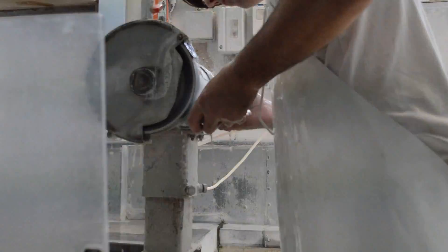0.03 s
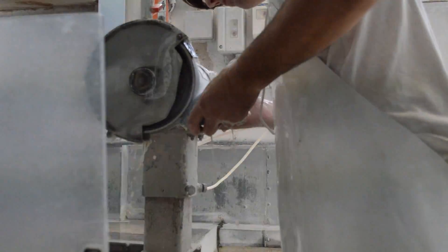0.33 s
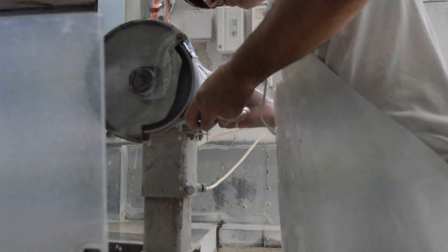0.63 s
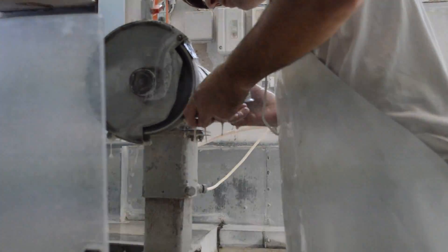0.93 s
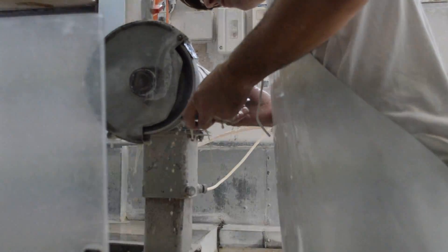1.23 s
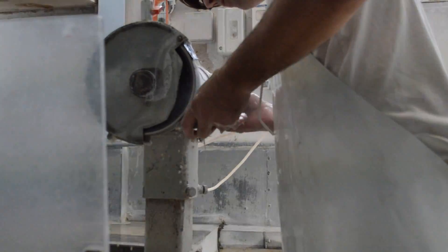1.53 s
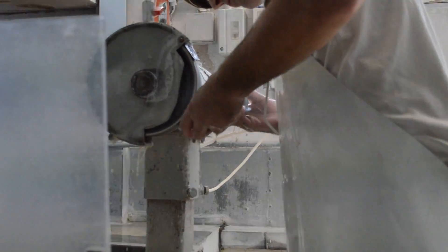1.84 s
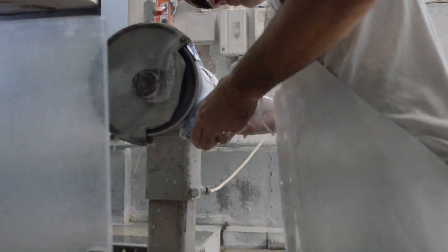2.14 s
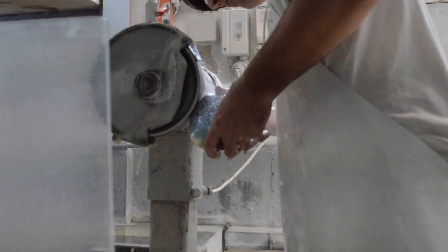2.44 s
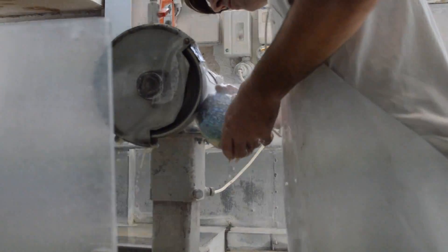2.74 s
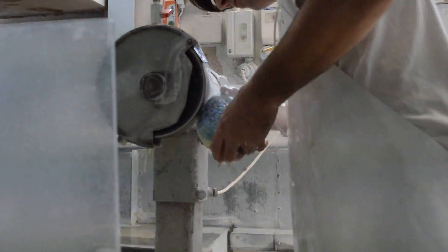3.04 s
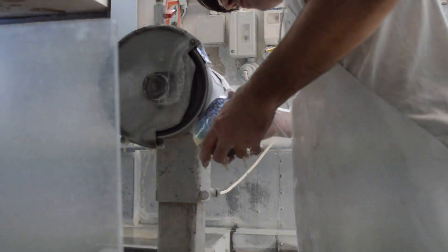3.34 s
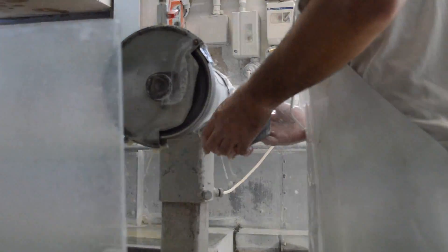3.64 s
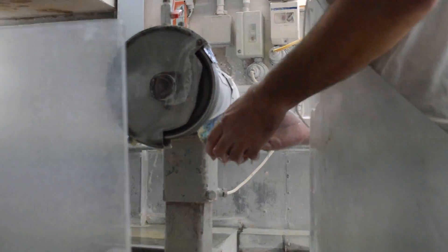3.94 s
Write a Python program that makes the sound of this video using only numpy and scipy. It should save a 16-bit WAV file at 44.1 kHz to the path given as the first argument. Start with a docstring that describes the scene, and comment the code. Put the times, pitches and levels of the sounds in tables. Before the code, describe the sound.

A shell grinds on a wheel with a bright rasp, lifting off to leave motor noise.

```python
"""A bright, rasping hiss cuts in close by: a shell pressed against a wet grinding wheel in a workshop.
Grit strikes the shell, and the hiss follows the pressure. Grit also sets the shell's resonances ringing,
lower once it is turned; now and then its edge bites in a short, harsh burst.
When it is lifted off, the hum and rush of the machine come forward, with a fizz of spray."""
import sys
import numpy as np
from scipy import signal
from scipy.fft import rfft, irfft, next_fast_len
from scipy.io import wavfile
from scipy.ndimage import uniform_filter1d, map_coordinates

SR = 44100
rng = np.random.default_rng(int(sys.argv[2]) if len(sys.argv) > 2 else 0)


def persist_wave(psi):
    """Save psi, clipped to +-1, as 16-bit WAV."""
    counts = np.round(np.clip(psi, -1, 1) * 32767).astype(np.int16)
    wavfile.write(sys.argv[1], SR, np.atleast_2d(counts).T)


N = 176400
TIME_S = np.arange(N) / SR
WHEEL_HZ = 47.9  # turns a second


def amp(db):
    """Amplitude ratio: a factor of ten for every 20 dB."""
    return 10 ** (np.asarray(db) / 20)


def envelope(points):
    """Exponential growth and decay: straight lines in decibels between (time_s, level_db) points."""
    return amp(np.interp(TIME_S, *np.transpose(points)))


def unit_rms(x):
    """Normalisation to a mean power of one."""
    return x / np.sqrt(np.mean(x ** 2) + 1e-20)


def wobble(rate_hz):
    """Smooth random modulation: a spline through rate_hz Gaussian values a second."""
    knots = rng.standard_normal(int(N * rate_hz / SR) + 4)
    return map_coordinates(knots, [TIME_S * rate_hz])


def filtered(x, response):
    """Linear filtering: the spectrum is multiplied by a frequency response."""
    size = next_fast_len(N + 8192)
    return irfft(rfft(x, size) * response(np.fft.rfftfreq(size, 1 / SR)), size)[:N]


def coloured(x, spectrum):
    """Spectral shaping by (frequency_hz, gain_db) points; the result has rms 1."""
    points_hz, gain_db = np.transpose(spectrum)
    return unit_rms(filtered(x, lambda hz: amp(np.interp(np.log(hz + 1), np.log(points_hz), gain_db))))


def resonance(x, pitch_hz, width_hz):
    """Two damped resonators in cascade, with half-power bandwidth width_hz; the result has rms 1."""
    stage_hz = 1.55 * width_hz  # each stage is wider than the pair

    def response(hz):
        damping = 1j * hz * stage_hz
        return (damping / (pitch_hz ** 2 - hz ** 2 + damping)) ** 2
    return unit_rms(filtered(x, response))


def patchy(x, depth_db):
    """Random gain over time and frequency makes the colour shift from moment to moment."""
    spectrogram = signal.stft(x, nperseg=1024)[2]
    field = uniform_filter1d(rng.standard_normal(spectrogram.shape), size=8, axis=0)
    field = unit_rms(uniform_filter1d(field, size=7, axis=1))
    return signal.istft(spectrogram * amp(depth_db * field), nperseg=1024)[1][:N]


def grit(strikes_per_s=3600, log_spread=0.3, power_share=0.45):
    """Shot noise: single grains strike at random over a bed of steady friction noise."""
    struck = rng.random(N) < strikes_per_s / SR
    sizes = np.exp(log_spread * rng.standard_normal(N))
    strikes = unit_rms(struck * sizes * rng.choice([-1, 1], N))
    return np.sqrt(power_share) * strikes + np.sqrt(1 - power_share) * rng.standard_normal(N)


def chatter(fast_db, slow_db, once_a_turn_db=0.6):
    """Amplitude modulation: the shell trembles, and the uneven wheel nudges it once a turn."""
    tremble_db = fast_db * wobble(650) + slow_db * wobble(55)
    nudge_db = once_a_turn_db * np.sin(2 * np.pi * WHEEL_HZ * TIME_S)
    return unit_rms(amp(tremble_db + nudge_db))


def room(x, t60_s=0.14, reflections_db=-7, cutoff_hz=15000):
    """Reverberation: dense reflections from nearby walls arrive after 4 ms and decay exponentially."""
    t = np.arange(SR // 3) / SR
    tail = rng.standard_normal(len(t)) * amp(-60 * t / t60_s) * (t > .004)
    reflections = signal.fftconvolve(x, tail / np.linalg.norm(tail))[:N]
    return x + amp(reflections_db) * filtered(reflections, lambda hz: 1 / (1 + (hz / cutoff_hz) ** 2))


# Tones of the motor: pitch_hz, relative_db, waver_db
HUM_TONES = [(162.9, -3.5, 2), (250, -7.5, 2.5), (325.3, -7.5, 4), (791, -8.5, 2.5), (895, -14, -4)]
# Envelopes of the motor hum and of the wheel's deep drone: time_s, level_db
HUM_LEVEL = [(.04, -43.5), (.3, -30.5), (.8, -31.5), (1.5, -31), (2.3, -32.5), (3.05, -31), (3.45, -29.5),
             (3.78, -21), (4, -21)]
DRONE_LEVEL = [(0.04, -69), (0.07, -51), (0.89, -40.5), (1.45, -56), (1.75, -44), (2.31, -56), (3.93, -38),
               (4.0, -53)]


def motor():
    """Rotating machinery radiates tones: a wavering hum, and a drone at the rotation frequency."""
    hum = np.zeros(N)
    for pitch_hz, relative_db, waver_db in HUM_TONES:
        gain = amp(relative_db + waver_db * wobble(9))
        phase_drift = 0.14 * waver_db * wobble(14)
        hum += gain * np.sin(2 * np.pi * pitch_hz * TIME_S + phase_drift)
    drone = np.sin(2 * np.pi * WHEEL_HZ * TIME_S)
    return envelope(HUM_LEVEL) * hum + envelope(DRONE_LEVEL) * drone


# Spectrum of the running wheel and its spray: frequency_hz, gain_db
RUSH_SPECTRUM = [(25, -46), (55, -24), (75, -22), (95, -19.5), (140, -11), (200, -6.5), (310, -3.5),
                 (450, -9.5), (750, -12.5), (1300, -13), (2000, -16), (3600, -12.5), (4700, -16.5),
                 (6000, -23.5), (7300, -29), (9700, -20), (11000, -26.5), (13000, -37), (15500, -47)]
# Envelope of that rush: time_s, relative_db
RUSH_LEVEL = [(.04, -38), (.2, -31.5), (.36, -26), (.45, -32.5), (.8, -29), (1.1, -30), (1.41, -30.5),
              (1.6, -27), (2.05, -30.5), (2.4, -32), (2.53, -27), (3.0, -26.5), (3.15, -32), (3.4, -28),
              (3.55, -22), (3.75, -21), (4, -19)]


def wheel_rush(gain_db=3, flutter_db=0.62):
    """Broadband noise from the wheel and its spray, with slight random amplitude modulation."""
    rush = coloured(patchy(grit(), depth_db=1), RUSH_SPECTRUM)
    return envelope(RUSH_LEVEL) * amp(gain_db + flutter_db * wobble(25.15)) * rush


# Spatters thrown off the wheel: start_s, peak_db
SPLASHES = [(1.251, -25), (2.19, -22), (3.443, -16), (3.51, -18.5), (3.585, -28), (3.655, -20)]
# Their spectrum: frequency_hz, gain_db
SPLASH_SPECTRUM = [(500, -28), (2200, -8), (3000, -5), (3900, 1.5), (4900, -9), (6200, -20), (9000, -38),
                   (15800, -60)]


def splashes(rise_s=0.0075):
    """Impact noise: flung water and grit make bursts that swell quickly and die away."""
    bursts = np.zeros(N)
    for start_s, peak_db in SPLASHES:
        age = np.maximum(TIME_S - start_s, 0) / rise_s
        bursts += amp(peak_db) * age * np.exp(1 - age)
    return bursts * coloured(grit(), SPLASH_SPECTRUM)


# Catches of the shell's edge: start_s, length_s, level_db
BITES = [(.905, 0.043, -24), (1.728, 0.01, -15), (1.746, 0.009, -16), (1.929, 0.0084, -23),
         (1.948, 0.0099, -11), (1.970, .013, -9.5), (2.004, 0.014, -9.5), (2.042, .005, -15),
         (2.053, 0.027, -23), (2.705, 0.043, -23), (3.093, 0.021, -12), (3.363, 0.025, -15)]
# Their spectrum: frequency_hz, gain_db
BITE_SPECTRUM = [(3000, -21), (7000, -6.5), (8800, -14), (10000, 5), (11200, -4), (12500, -5), (13300, -12),
                 (15800, -20.5)]


def edge_bites(attack_s=0.0029, release_s=0.0025):
    """Friction transients: the force rises, holds and decays each time the edge catches the wheel."""
    force = np.zeros(N)
    for start_s, length_s, level_db in BITES:
        attack = np.clip((TIME_S - start_s) / attack_s, 0, 1)
        release = np.exp(-np.maximum(TIME_S - start_s - length_s, 0) / release_s)
        force += amp(level_db) * attack * release
    return force * coloured(grit() * chatter(fast_db=2.7, slow_db=0.5), BITE_SPECTRUM)


# Shell resonances that sing out briefly: centre_s, length_s, pitch_hz, width_hz, peak_db
FLARES = [(.33, .07, 6250, 170, -27.5), (0.398, 0.1, 4470, 250, -23.5), (0.552, .08, 11100, 900, -18.5),
          (0.73, 0.056, 4430, 280, -26), (.92, 0.038, 8400, 700, -16.5), (1.115, 0.077, 9620, 250, -16.5),
          (1.312, 0.052, 8360, 702, -18), (1.31, 0.06, 9450, 298, -16), (1.451, 0.086, 9700, 250, -20.5),
          (1.643, 0.19, 1550, 130, -29), (1.668, 0.17, 2810, 280, -24), (1.682, 0.081, 3880, 650, -23),
          (1.805, 0.033, 9200, 250, -17), (1.983, 0.22, 2530, 200, -32.5), (2, 0.077, 5890, 250, -25),
          (2.218, 0.14, 3340, 300, -34), (2.973, .07, 2394, 200, -28), (3.038, 0.045, 3900, 200, -26),
          (3.323, 0.047, 9300, 250, -22)]


def mode_flares():
    """Selective excitation: single modes swell and fade as the contact point wanders."""
    drive, out = grit(), np.zeros(N)
    for centre_s, length_s, pitch_hz, width_hz, peak_db in FLARES:
        swell = np.exp(-2 * ((TIME_S - centre_s) / length_s) ** 2)
        out += amp(peak_db) * swell * resonance(drive, pitch_hz, width_hz)
    return out


# Shell modes as first held, then three groups once turned: pitch_hz, width_hz, relative_db
FIRST_MODES = [(1665, 185, -7), (3030, 530, -1), (4330, 580, -2.5), (6290, 400, -2)]
TURNED_LOW_MODES = [(1284, 31, -0.94), (1344.2, 47, -0.11)]
TURNED_MID_MODES = [(2510, 150, -3.5), (2960, 260, -7.5), (4043, 220, 4)]
TURNED_HIGH_MODES = [(4165, 360, -10.5), (5635, 230, -4), (7500, 430, -3)]
# How strongly each group rings: time_s, level_db
FIRST_RING = [(.04, -35), (.2, -28.5), (.36, -28.5), (.6, -30), (.78, -26), (1.1, -28), (1.5, -28.5),
              (1.75, -44), (2, -64.5)]
LOW_RING = [(1.75, -64), (1.93, -31.5), (2.1, -41.5), (2.27, -30), (2.4, -37.5), (2.55, -31), (2.72, -24.5),
            (2.85, -30.5), (2.97, -22), (3.08, -37.5), (3.3, -34), (3.4, -42.5)]
MID_RING = [(1.6, -70), (1.85, -38), (1.98, -33), (2.12, -28), (2.26, -24), (2.42, -34), (2.6, -27.5),
            (2.7, -26), (2.86, -27), (2.99, -25.5), (3.13, -28), (3.25, -38), (3.36, -29.5)]
HIGH_RING = [(1.6, -75), (1.85, -29), (2, -31), (2.15, -30.5), (2.35, -24.5), (2.48, -28), (2.6, -35),
             (2.73, -23.5), (2.85, -32.5), (3, -25), (3.13, -17.5), (3.26, -28.5), (3.35, -17.5),
             (3.41, -32)]
# Glide of all these modes as the contact moves over the shell: time_s, pitch_ratio
MODE_GLIDE = [(0, 1.02), (0.401, 0.95), (.56, 1.03), (.75, 1.004), (1.0, 1.02), (1.7, 1.0), (2.0, 1),
              (2.3, 1.005), (2.6, .99), (2.931, 0.97), (3.1, 1.015), (3.35, 0.99)]


def shell_ring(waver_db=1.5):
    """Forced vibration: grit drives the hand-damped shell; which modes answer depends on the hold."""
    drive, out = grit() * chatter(fast_db=1.2, slow_db=0.7), np.zeros(N)
    read_position = np.cumsum(np.interp(TIME_S, *np.transpose(MODE_GLIDE)))  # resampling bends pitch
    for modes, ring_level in [(FIRST_MODES, FIRST_RING), (TURNED_LOW_MODES, LOW_RING),
                              (TURNED_MID_MODES, MID_RING), (TURNED_HIGH_MODES, HIGH_RING)]:
        ringing = sum(amp(relative_db + waver_db * wobble(12)) * resonance(drive, pitch_hz, width_hz)
                      for pitch_hz, width_hz, relative_db in modes)
        gliding = map_coordinates(ringing, [read_position], mode="mirror")
        out += envelope(ring_level) * unit_rms(gliding)
    return out


# Envelopes of the hiss, which follows the pressure, and of the lower rasp: time_s, relative_db
HISS_LEVEL = [(.04, -27), (.08, -19.5), (.21, -23), (.38, -14), (.55, -15.5), (.68, -16.5), (.86, -16),
              (.96, -14), (1.12, -17.5), (1.22, -17), (1.29, -13), (1.39, -18), (1.47, -17.5),
              (1.62, -19.5), (1.76, -15), (1.9, -19), (1.99, -13), (2.03, -18), (2.07, -10.5),
              (2.13, -20.5), (2.2, -16.5), (2.33, -13.5), (2.39, -20), (2.47, -22), (2.54, -17),
              (2.63, -24), (2.72, -11), (2.8, -18), (2.94, -22.5), (3.03, -13), (3.12, -15.5),
              (3.19, -14.5), (3.25, -23), (3.32, -16), (3.4, -18)]
RASP_LEVEL = [(.04, -41), (.15, -32.5), (.33, -28), (.45, -26), (.62, -28.5), (.75, -27.5), (.92, -24.5),
              (1.05, -32), (1.2, -29), (1.3, -26.5), (1.4, -33), (1.55, -25), (1.7, -24.5), (1.86, -24.5),
              (2.04, -29.5), (2.12, -30), (2.21, -25.5), (2.32, -25), (2.41, -35), (2.56, -23.5),
              (2.68, -25), (2.82, -28.5), (2.97, -21), (3.1, -25.5), (3.24, -30.5), (3.33, -23),
              (3.41, -37)]
# Their spectra with the shell as first held and once turned: frequency_hz, gain_db
FIRST_HISS = [(500, -70), (2000, -52), (5000, -13.5), (6900, -19), (8000, -10), (8800, -4.5), (9600, -2),
              (10400, -3), (11200, -7), (12200, -7), (12900, -18.5), (14500, -14.5), (15800, -30)]
TURNED_HISS = [(500, -70), (4000, -17), (6000, -19), (6800, -37), (7700, -15.5), (8700, -9), (9400, 1.5),
               (10200, -4.5), (11200, -9), (12300, -12), (13300, -22), (14700, -22), (15800, -28)]
FIRST_RASP = [(60, -60), (250, -9), (600, -1), (1200, -3.5), (2000, -3.5), (2800, 0), (4200, 0),
              (5200, -2.5), (7000, -0.5), (12000, -23)]
TURNED_RASP = [(60, -60), (250, -14), (600, -0.5), (1050, -9), (1500, 2), (2050, -3.5), (2500, 0),
               (3100, 7.5), (3500, -10.5), (4400, 2.5), (4900, -1.5), (5900, 2), (6700, -7), (12000, -30)]


def grinding(hiss_db=-0.34, rasp_db=-1, turn_span_s=(1.06, 2.76)):
    """Abrasion noise: a bright hiss and a lower rasp, both changing colour as the shell is turned."""
    turned = np.sin(np.interp(TIME_S, turn_span_s, [0, np.pi / 2])) ** 2

    def crossfade(x, first_spectrum, turned_spectrum):
        return (1 - turned) * coloured(x, first_spectrum) + turned * coloured(x, turned_spectrum)
    hiss_drive = patchy(grit(), depth_db=3.1) * chatter(fast_db=0.15, slow_db=0.73)
    rasp_drive = patchy(grit(), depth_db=0.2) * chatter(fast_db=1.55, slow_db=0.44)
    hiss = envelope(HISS_LEVEL) * crossfade(hiss_drive, FIRST_HISS, TURNED_HISS)
    rasp = envelope(RASP_LEVEL) * crossfade(rasp_drive, FIRST_RASP, TURNED_RASP)
    return amp(hiss_db) * hiss + amp(rasp_db) * rasp


def scene(lift_s=3.4, fade_db_per_s=332):
    """Superposition: the contact sounds last until the shell is lifted; the machine runs on."""
    contact = amp(-fade_db_per_s * np.maximum(TIME_S - lift_s, 0))
    shell = contact * (grinding() + shell_ring() + mode_flares())
    return (room(shell + splashes()) + edge_bites() + motor() + wheel_rush())[None]


def record(dry):
    """Gating, clipping and band limiting: an abrupt start, peaks cut at full scale, no top treble."""
    start_s, cutoff_hz = 0.035, 15750
    clipped = np.clip(dry[0] * (TIME_S > start_s), -1, 1)
    return filtered(clipped, lambda hz: hz < cutoff_hz)[None]


dry = scene()
out = record(dry)
persist_wave(out)
```